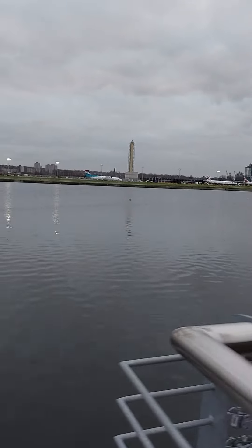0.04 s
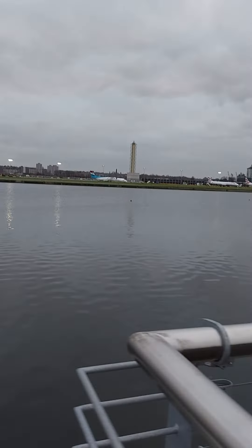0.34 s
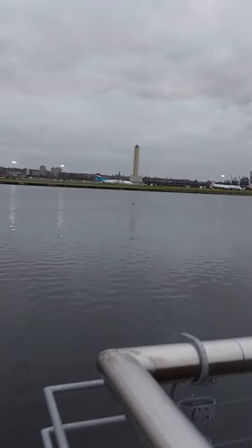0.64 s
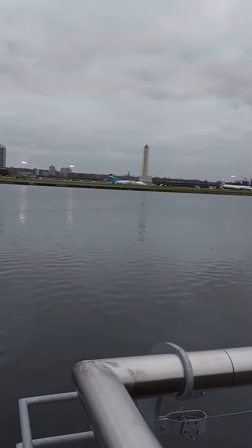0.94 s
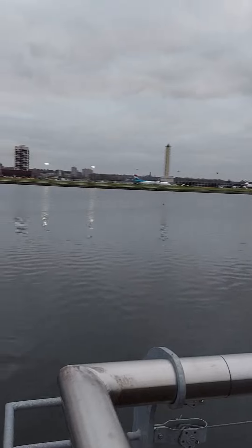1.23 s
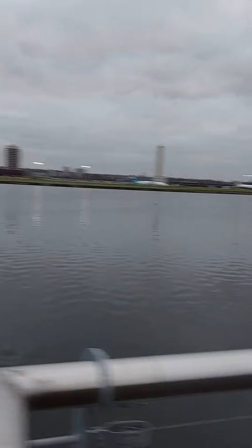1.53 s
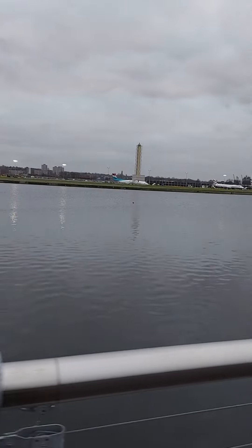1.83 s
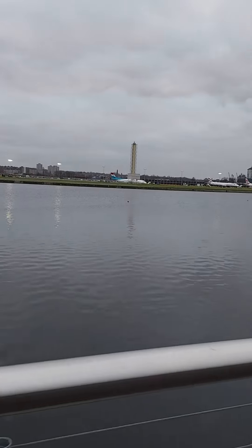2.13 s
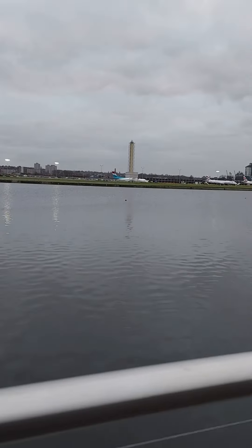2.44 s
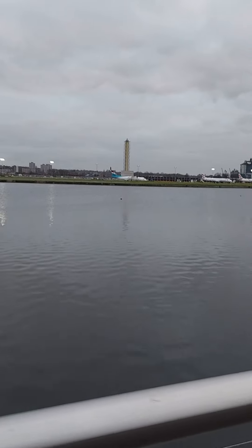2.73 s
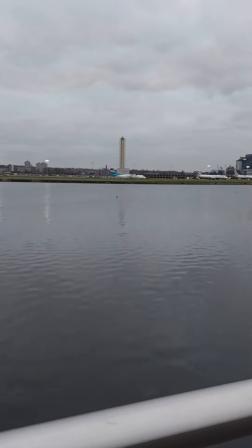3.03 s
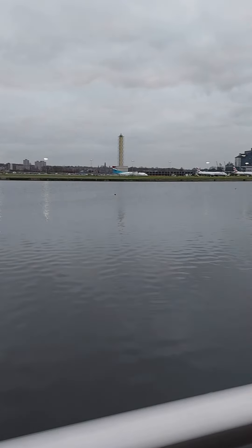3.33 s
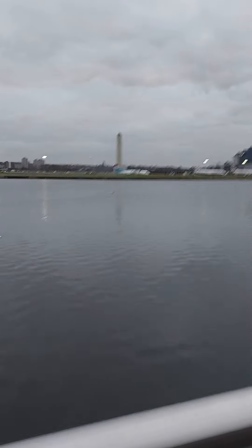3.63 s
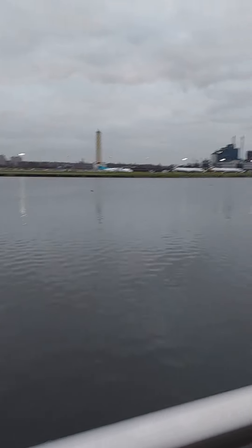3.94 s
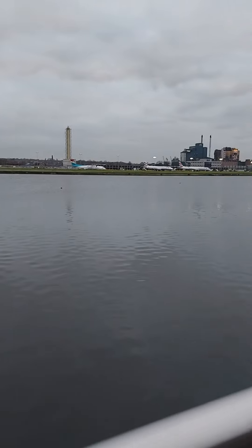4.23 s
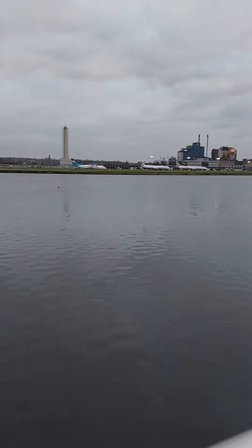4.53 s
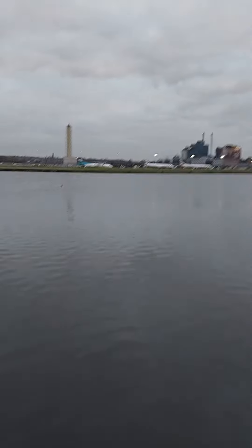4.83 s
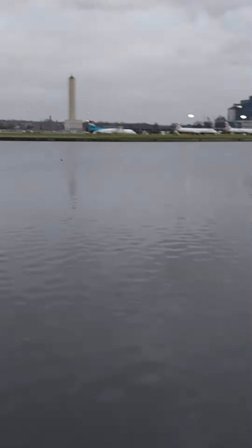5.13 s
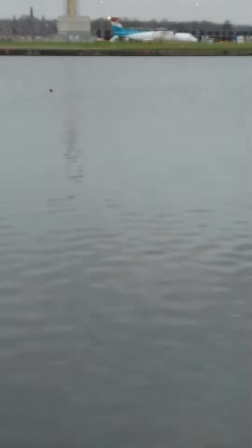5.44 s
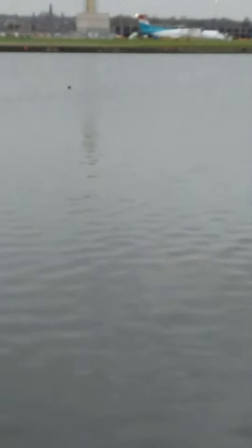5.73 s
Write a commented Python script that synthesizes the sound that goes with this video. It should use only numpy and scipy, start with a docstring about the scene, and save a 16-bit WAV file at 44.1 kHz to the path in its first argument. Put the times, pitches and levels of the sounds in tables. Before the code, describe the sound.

From the start, jet airliners idling far across the water make a steady low drone and dull roar, with a faint turbine hiss that comes and goes. At about 1.2 seconds one engine begins to spool up. Its thin whine climbs in pitch, fading in and out, clearest around 2.5 and 3.6 seconds, then levels off from about 4.3 seconds and swells again near 5.2. A fainter, lower whine rises beneath it, while the rumble grows and throbs gently. Close to the hand-held stereo microphone, puffs of breeze thump the left side at about 0.7, 1.3 and 3.6 seconds, then repeatedly from 5 to nearly 6 seconds. Very soft brushing passes on and off, slightly to the right. A quick cluster of small ticks comes near 3.6 seconds, with single ones around 4.2 and 4.8.

```python
"""Low drone and dull roar of airliners idling across a wide dock, heard on a hand-held microphone pair.
One spools up: its fan's blade tone climbs, fading in and out in the air over the water, while the
exhaust's jet-mixing rumble grows. Close by, puffs of breeze thump the left microphone, and something
brushes softly past and ticks a few times."""
import sys
import numpy as np
from scipy import signal
from scipy.fft import rfft, irfft
from scipy.io import wavfile

SR = 44100
rng = np.random.default_rng(int(sys.argv[2]) if len(sys.argv) > 2 else 0)


def wrap_up_sound(samples):
    """Save the sound to the file named by the first command line argument, as 16-bit audio."""
    columns = np.atleast_2d(samples).T
    # keep every value between -1 and 1, then stretch to whole-number steps
    tamed = np.clip(columns, -1, 1)
    steps = np.round(tamed * 32767).astype(np.int16)
    wavfile.write(sys.argv[1], SR, steps)


N = 260190
TIME_S, BINS_HZ = np.arange(N) / SR, np.fft.rfftfreq(N, 1 / SR)
JITTER_HZ = 7  # blade-tone pitch jitter from turbulence over the water

# spectra (frequency [Hz], relative density [dB])
BREEZE_SPECTRUM = [(8, -41.5), (25, -19), (55, -4), (90, 4.5), (160, -7), (250, -15.5), (400, -26.5),
                   (900, -57.5), (3000, -90.5)]
BRUSH_SPECTRUM = [(3240, -27.5), (5500, 2), (6670, -2), (7290, -0.5), (10200, -5), (13400, -1), (15200, -4),
                  (16000, -15)]
RUMBLE_IDLE = [(12, -70), (20, -42.5), (43, -24.5), (51, -15), (65, -5.5), (97, -7), (115, 1), (131, -1.5),
               (146, -8.5), (168, -5), (200, -10), (220, -10.3), (306, -10.6), (385, -16.5), (520, -29),
               (680, -59.5), (1140, -120)]
RUMBLE_THRUST = [(12, -64), (20, -35), (37, -28.5), (59, -5.5), (80, 0), (119, -5), (146, -8), (182, -13),
                 (246, -22.5), (314, -18.5), (345, -18.5), (375, -22), (460, -28.5), (520, -41.5),
                 (680, -64), (1140, -120)]
ROAR_IDLE = [(260, -37.5), (450, -7.5), (560, -5), (750, -4), (980, -3.5), (1300, -5), (2000, -6.5),
             (2600, -17), (3100, -18.5), (4100, -23), (4650, -26), (5700, -37.5), (9000, -46.5),
             (12500, -37), (16000, -50.5)]
ROAR_THRUST = [(300, -24.5), (430, -7.5), (500, -0.5), (650, -1.5), (1000, -1.5), (1600, -7.5),
               (2150, -8.5), (2500, -10.5), (3000, -17.5), (3800, -24), (4500, -23.5), (5200, -31.5),
               (6500, -49), (9800, -46), (11500, -38.5), (16000, -47)]
TICK_SPECTRUM = [(500, -6), (1500, -3), (3000, 2), (5000, 3), (5900, -2), (8000, 1), (9700, -5),
                 (11300, 5.5), (13000, 0), (16000, -5)]
# far sound at the microphone pair
COHERENCE = [(25, .998), (200, .998), (350, .96), (480, .8), (680, .94), (1100, .86), (2200, .72),
             (4500, .55), (6500, .2), (15000, .05)]  # (frequency [Hz], shared power [0-1])
BALANCE = [(60, 0), (220, 0), (380, -3), (570, 5.5), (950, 0), (1400, -1.5), (2400, -5), (3150, 0.5),
           (4300, -6), (6000, 0), (15000, 1)]  # (frequency [Hz], left minus right [dB])
PHASE_LEAD = [(40, 0), (290, -0.37), (480, 1.12), (750, -1), (1000, 0.42), (1700, 0.86), (2300, 1.5),
              (2800, 3), (3500, 3.5), (4500, 5), (6500, 8)]  # (frequency [Hz], left lead [rad])
# soft events (middle [s], length [s], level [dB])
BRUSH_STROKES = [(0.1, 0.28, -64), (0.575, 0.15, -68.5), (0.883, 0.18, -67), (1.55, 0.16, -64.5),
                 (1.93, 0.3, -66), (2.51, 0.17, -66.5), (3.45, 0.3, -76.5), (3.77, 0.29, -60.5),
                 (4.027, 0.13, -67.5), (4.22, 0.1, -69), (4.4, 0.66, -69.5), (5.02, 0.32, -66)]
BASS_SURGES = [(1.2, 0.22, -34), (2.08, 0.15, -35), (2.98, 0.15, -31.5), (3.25, 0.15, -27.5),
               (3.73, 0.15, -29.5), (4.37, 0.06, -23.5), (5.14, 0.08, -25.5), (5.46, 0.06, -26.5)]
ROAR_HOLLOWS = [(2.17, 0.2, -52), (2.55, 0.25, -52.5), (4.33, 0.3, -48.5), (4.66, 0.22, -49),
                (5.04, 0.35, -47)]
# far sound coming and going (middle [s], length [s], lift [dB])
DRONE_SWELLS = [(1.9, 1.1, 1), (3.45, 1.1, -2)]
WHINE_SWELLS = [(1.5, 0.3, 3), (2.15, 0.14, -3), (2.32, 0.11, 6), (2.48, 0.25, 9.5), (2.7, 0.21, 11.5),
                (2.85, 0.14, 4.5), (3.09, 0.12, 4.5), (3.38, 0.09, 6.5), (3.59, 0.14, 13),
                (4.48, 0.13, 3.5), (4.72, 0.072, 5.5), (4.96, 0.2, -1), (5.12, 0.053, 8), (5.24, 0.079, 10),
                (5.4, 0.14, 5.5), (5.6, 0.1, -3), (5.78, 0.08, 1)]
# spool-up of the main engine and a fainter one (time [s], blade-passing pitch [Hz])
FAN_PITCH = [(1.2, 1410), (2.2, 1577), (2.75, 1758), (3.0, 1792), (3.3, 1890), (3.6, 2025), (3.8, 2065),
             (4.25, 2195), (5.3, 2230), (5.9, 2240)]
TWIN_PITCH = [(2.6, 1430), (3.6, 1560), (4.2, 1790), (4.8, 1910), (5.9, 1930)]
PUFFS = [(0.708, -21.5, 0.072), (1.29, -28, 0.024), (3.58, -26, 0.028), (3.77, -34, 0.1),
         (4.59, -33, 0.087), (5.09, -19.5, 0.026), (5.23, -25.5, 0.09), (5.44, -23, 0.077),
         (5.58, -24.5, 0.18), (5.76, -23, 0.1)]  # breeze (time [s], level [dB], decay [s])
TICKS = [(3.579, -29.5, -19, 8400), (3.587, -46, -8, 14000), (3.6235, -47, -13, 12000),
         (3.637, -42, -5, 11600), (3.648, -33, -1, 7000), (4.211, -50, -9, 8000), (4.793, -36.5, -3, 5200)]  # (time [s], relative level [dB], left minus right [dB], ring [Hz])
DRONE_BANDS = [(76.74, 6, -34), (93.7, 3, -42.5), (120.9, 13, -40), (173.5, 7.4, -43), (226.7, 9, -47),
               (274.1, 10, -47), (292.7, 14, -50), (315.5, 14, -46)]  # idling engines (centre [Hz], width [Hz], level [dB])
HISS_SWELLS = [(1.27, 0.25, -67, 4100), (1.57, 0.18, -63, 4100), (1.85, 0.14, -61, 3950),
               (1.99, 0.15, -62, 4400), (2.34, 0.29, -60, 4300), (2.6, 0.14, -66, 4000),
               (2.87, 0.2, -65, 4000), (3.12, 0.22, -62.5, 4250), (4.19, 0.1, -65, 4400),
               (4.98, 0.2, -63, 4400), (5.67, 0.13, -60, 4550)]  # turbine (middle [s], length [s], level [dB], centre [Hz])
BUZZ_TONES = [(9, -62), (10, -60), (11, -61), (13, -63)]  # fan (multiple of shaft rate, level at full thrust [dB])


def gain(db):
    """Decibels to amplitude."""
    return 10 ** (np.asarray(db) / 20)


def unit_rms(x):
    """Scales to rms 1."""
    return x / np.sqrt(np.mean(abs(x) ** 2) + 1e-20)


def per_bin(table):
    """Frequency table interpolated on a log axis."""
    hz, value = np.transpose(table)
    return np.interp(np.log(BINS_HZ + 1), np.log(hz + 1), value)


def track(table):
    """Last column of a time table, per sample."""
    time_s, *_, value = np.transpose(table)
    return np.interp(TIME_S, time_s, value)


def bells(rows):
    """Sum of bell curves from (middle [s], half-height length [s], height) rows."""
    middle_s, length_s, height = np.transpose(rows)
    offset = 2 * (TIME_S - middle_s[:, None]) / length_s[:, None]
    return height @ .5 ** np.minimum(offset ** 2, 60)


def envelope(events):
    """Amplitude of soft events."""
    return bells([(middle_s, length_s, gain(db)) for middle_s, length_s, db, *_ in events])


def noise(spectrum):
    """Coloured noise, rms 1."""
    return unit_rms(irfft(rfft(rng.standard_normal(N)) * gain(per_bin(spectrum)), N))


def wander(rate_hz):
    """Random drift up to about rate_hz, rms 1."""
    count = N // 16 + 2
    hz = np.fft.rfftfreq(count, TIME_S[-1] / count)
    slow = irfft(rfft(rng.standard_normal(count)) / (1 + (hz / rate_hz) ** 4), count)
    return unit_rms(np.interp(TIME_S, np.linspace(0, TIME_S[-1], count), slow))


def phase_rad(hz):
    """Running phase of a fixed or moving pitch."""
    return 2 * np.pi * np.cumsum(hz * np.ones(N)) / SR


def tone(hz):
    """Sine, rms 1."""
    return unit_rms(np.sin(phase_rad(hz)))


def band(hz, spread_hz):
    """Tone scrambled in level and phase by turbulence, rms 1."""
    rad = phase_rad(hz)
    return unit_rms(wander(spread_hz) * np.cos(rad) + wander(spread_hz) * np.sin(rad))


def twinkle(x, rate_hz, depth_db=3.5):
    """Level flicker from turbulence over the water, rms 1."""
    return unit_rms(x * gain(depth_db * np.minimum(wander(rate_hz), 1)))


def spool():
    """Fan speed above idle, 0-1."""
    hz = track(FAN_PITCH)
    return (hz - hz.min()) / np.ptp(hz)


def thrust():
    """Thrust above idle, 0-1."""
    return spool() ** 2.5


def jet_noise(idle, raised, share):
    """Mixing noise, crossfaded from the idle to the raised spectrum."""
    return np.sqrt(1 - share) * noise(idle) + np.sqrt(share) * noise(raised)


def from_afar(source):
    """Shared direct sound plus a separate diffuse field per microphone."""
    direct, left, right = (rfft(source()) for _ in range(3))
    shared = per_bin(COHERENCE)
    side = np.array([[.5], [-.5]])
    direct = direct * np.exp(1j * side * per_bin(PHASE_LEAD))
    pair = np.sqrt(shared) * direct + np.sqrt(1 - shared) * np.array([left, right])
    return irfft(pair * gain(side * per_bin(BALANCE)), N)


def breeze(rise_s=0.0072, eddies_db=-46, gust_db=5):
    """Low turbulence on the left microphone: small eddies, quick dying puffs."""
    strength = gain(eddies_db + gust_db * wander(7.4))
    for start_s, db, decay_s in PUFFS:
        age_s = np.maximum(TIME_S - start_s, 0)
        strength += gain(db) * np.minimum(age_s / rise_s, 1) * np.exp(-age_s / decay_s)
    return strength * noise(BREEZE_SPECTRUM) * np.array([[1], [0]])


def brushing(left_db=-4.5, right_db=4, grain_db=2, floor_db=-82):
    """Soft strokes of grainy friction hiss over a faint floor, separate per microphone."""
    hiss = np.array([unit_rms(noise(BRUSH_SPECTRUM) * gain(grain_db * wander(150))) for _ in range(2)])
    strokes = envelope(BRUSH_STROKES) * gain([[left_db], [right_db]])
    return hiss * np.hypot(strokes, gain(floor_db))


def ticks(lift_db=2, scatter_s=0.0009, ring_s=0.0005):
    """Near snaps: an impulse with about a millisecond of scatter and ring."""
    out = np.zeros((2, N))
    age_s = np.arange(300) / SR
    for time_s, db, pan_db, ring_hz in TICKS:
        scatter = .22 * rng.standard_normal((2, len(age_s))) * np.exp(-age_s / scatter_s)
        ring = .2 * np.cos(2 * np.pi * ring_hz * age_s) * np.exp(-age_s / ring_s)
        snap = (age_s == 0) + scatter + ring
        pair_db = db + lift_db + np.array([[.5], [-.5]]) * pan_db
        start = round(time_s * SR)
        out[:, start:start + len(age_s)] += snap * gain(pair_db)
    return irfft(rfft(out) * gain(per_bin(TICK_SPECTRUM)), N)


def drones(hum_hz=119, waver_hz=4, hum_db=-36, drop_db=1.5):
    """Low bands and wavering hum of idling engines; they recede a little with thrust."""
    hum = gain(hum_db) * tone(hum_hz + waver_hz * wander(5))
    bands = sum(gain(db) * band(hz, width_hz / 2) for hz, width_hz, db in DRONE_BANDS)
    return gain(bells(DRONE_SWELLS) - drop_db * thrust()) * (hum + bands)


def turbine(low_hz=4151, high_hz=4474, hiss_hz=4250, idle_db=-68, intake_hz=2170, intake_db=-58.5):
    """Two thin blade tones, hiss and intake noise recede with speed; more hiss swells as air shifts."""
    blade_tones = tone(low_hz + JITTER_HZ * wander(20)) + gain(-8) * band(high_hz, 18)
    idle = gain(idle_db - 10 * spool()) * (blade_tones + band(hiss_hz, 520))
    swells = envelope(HISS_SWELLS) * band(track(HISS_SWELLS), 520)
    intake = gain(intake_db - 13 * spool()) * band(intake_hz, 300)
    return idle + swells + intake


def exhaust(rumble_db=-31, rumble_rise_db=6, throb_db=1.6, roar_db=-43, roar_rise_db=1.14, flutter_db=.5):
    """Jet mixing: a throbbing, surging rumble builds with speed under a dull roar with hollow swells."""
    push = spool() ** 2.1
    rise_db = (rumble_rise_db + throb_db * np.minimum(wander(rate_hz=12), 1)) * push
    rumble = gain(rumble_db + rise_db) * jet_noise(RUMBLE_IDLE, RUMBLE_THRUST, push)
    roar_gain = gain(roar_db + roar_rise_db * thrust() + flutter_db * wander(rate_hz=14))
    roar = roar_gain * jet_noise(ROAR_IDLE, ROAR_THRUST, thrust())
    surges = envelope(BASS_SURGES) * band(hz=74, spread_hz=18)
    hollows = envelope(ROAR_HOLLOWS) * band(hz=650, spread_hz=95)
    return rumble + surges + roar + hollows


def buzz_saw(blades=24, spread_hz=4):
    """Near full speed, slightly unequal fan blades sound faint multiples of the shaft rate."""
    shaft_hz = track(FAN_PITCH) / blades
    return thrust() * sum(gain(db) * band(order * shaft_hz, spread_hz) for order, db in BUZZ_TONES)


def fan(whine_db=-53.5, skirt_db=-4, twin_db=-61, rush_db=-57, octave_db=-64.5):
    """Blade-passing whine, its scattered skirt and a lower twin; thrust adds a rush and hissy octave."""
    blade_hz = track(FAN_PITCH)
    carry_db = bells(WHINE_SWELLS)  # how well the air carries the whine
    core = twinkle(tone(blade_hz + JITTER_HZ * wander(14.17)), rate_hz=34)
    skirt = gain(skirt_db) * band(blade_hz, 60)
    whine = gain(whine_db + carry_db) * (core + skirt)
    twin = gain(twin_db) * band(track(TWIN_PITCH), 30)
    rush = gain(rush_db + .4 * carry_db) * band(1.05 * blade_hz, 200)
    octave = gain(octave_db) * twinkle(band(2 * blade_hz, 190), rate_hz=13)
    return spool() ** .24 * (whine + twin) + thrust() ** 2 * rush + thrust() * octave


def engines():
    """All aircraft sound, mono."""
    return exhaust() + drones() + turbine() + fan() + buzz_saw()


def scene():
    """Far engines plus small near sounds, stereo."""
    return from_afar(engines) + breeze() + brushing() + ticks()


def record(dry, fade_s=.008, cutoff_hz=15800):
    """Fade-in and low-pass."""
    faded = dry * np.minimum(TIME_S / fade_s, 1)
    lowpass = signal.firwin(511, cutoff_hz, window=("kaiser", 9), fs=SR)
    return signal.oaconvolve(faded, lowpass[None], "same")


dry = scene()
out = record(dry)
wrap_up_sound(out)
```